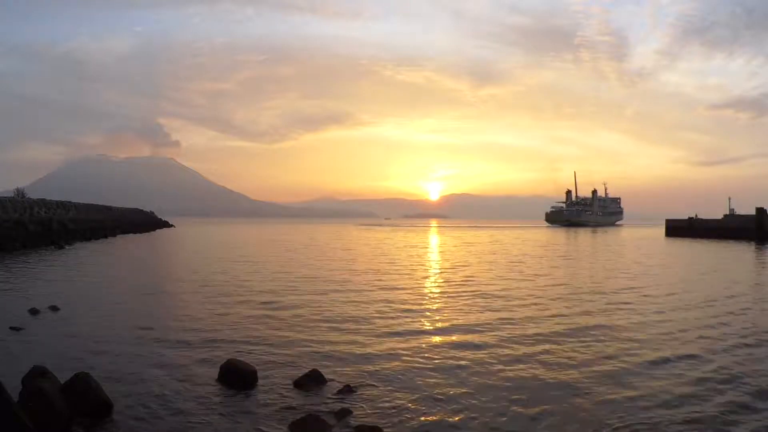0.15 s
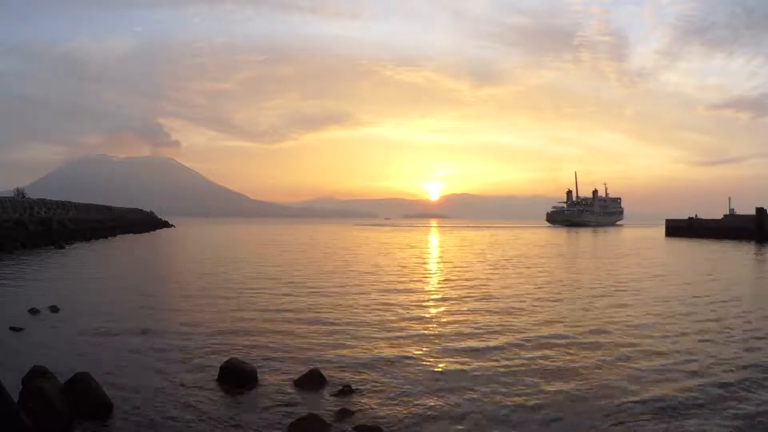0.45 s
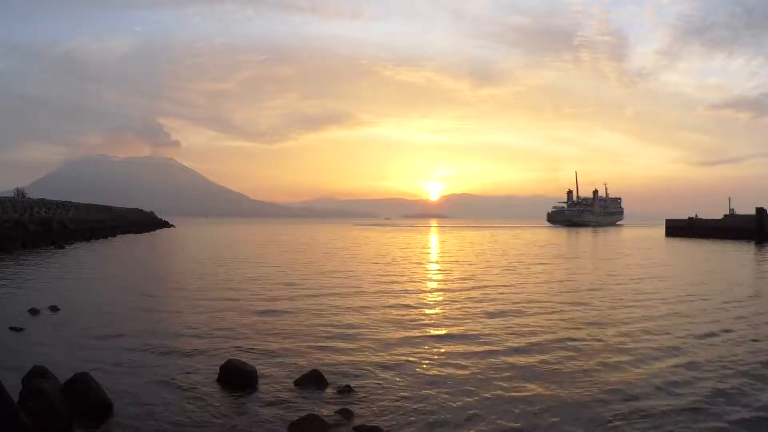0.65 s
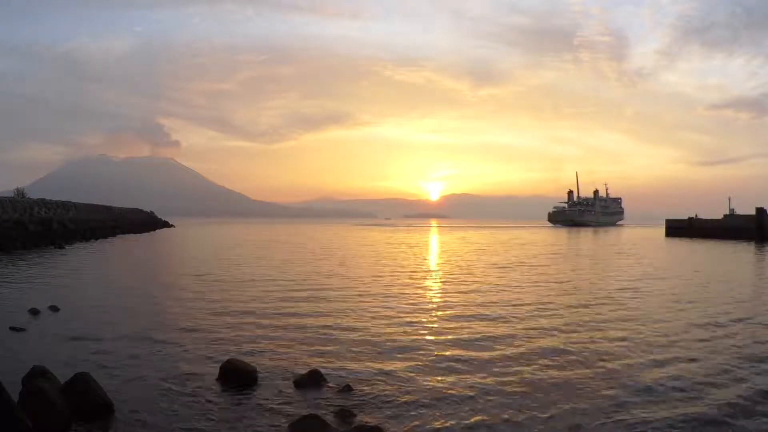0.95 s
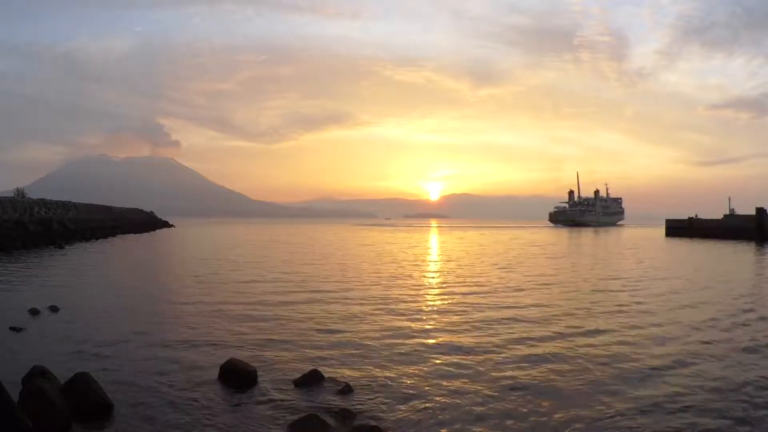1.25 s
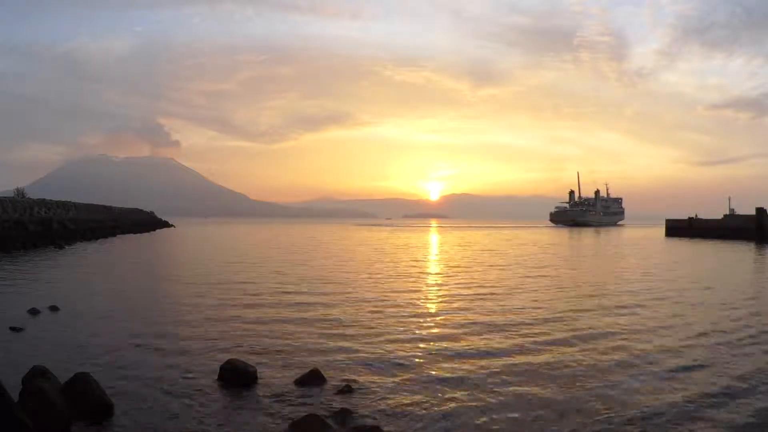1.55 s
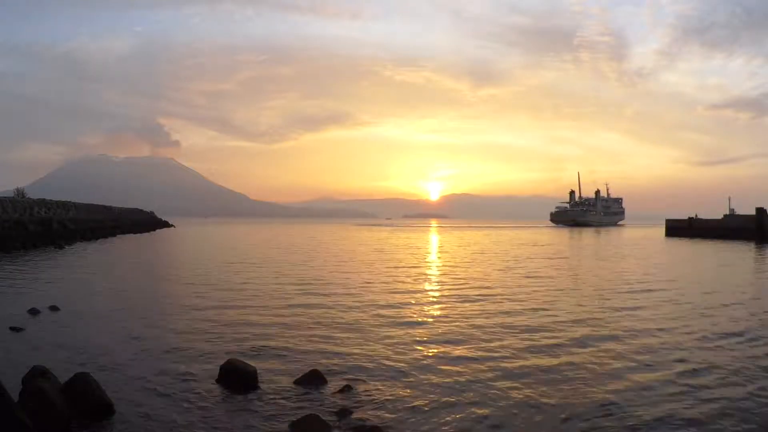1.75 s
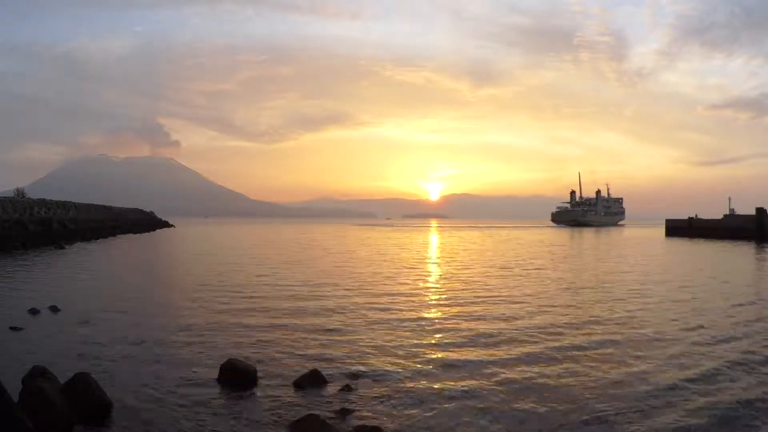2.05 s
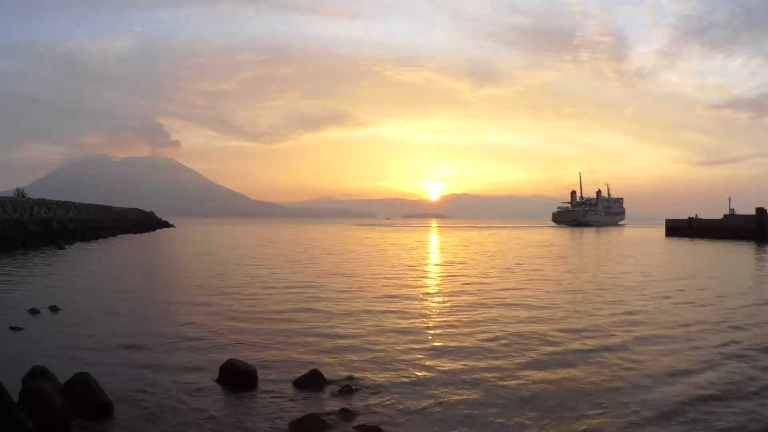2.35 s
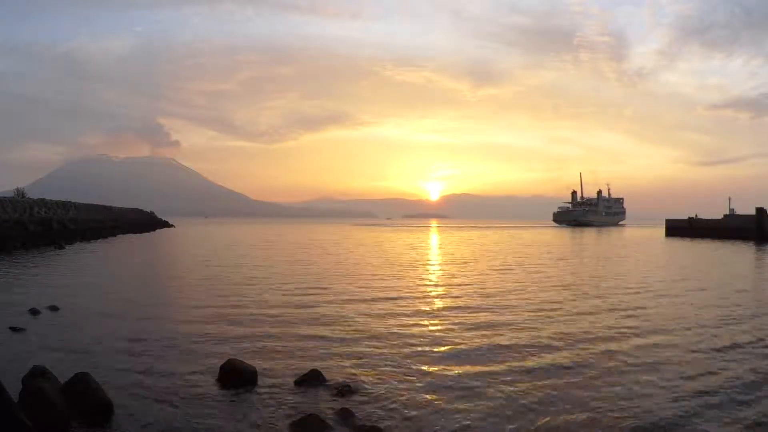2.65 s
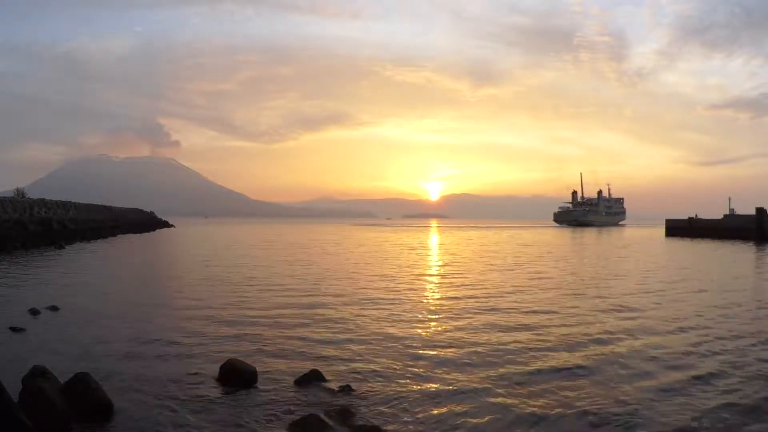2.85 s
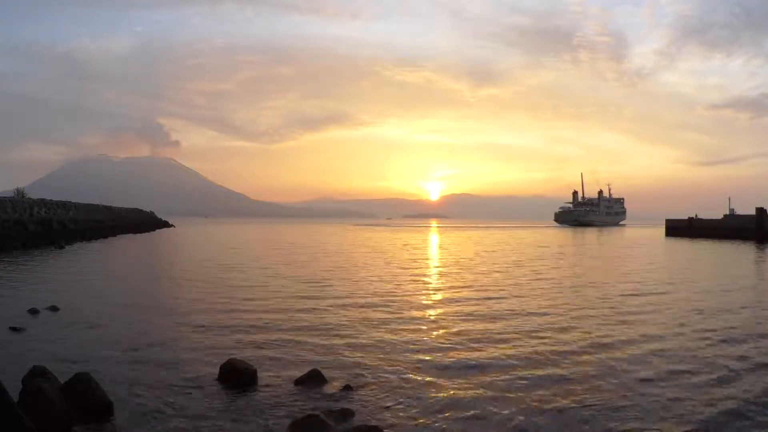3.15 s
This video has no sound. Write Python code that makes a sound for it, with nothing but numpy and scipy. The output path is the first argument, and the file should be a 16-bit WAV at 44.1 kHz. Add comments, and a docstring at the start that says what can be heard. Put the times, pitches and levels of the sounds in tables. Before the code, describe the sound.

A distant ferry's diesel engines drone steadily over softly washing, lapping harbour water.

```python
"""Distant ferry on calm harbour water

The diesels drone in unsteady shaft orders over a rumble, two close notes beating; the wash hisses.
Ripples lap at near rocks with soft splashes, plips, ticks and a gurgle dulled by the microphone's
closed housing. The electronics add a thin hiss and a faint high buzz.
A very faint patchy low rumble and high hiss are opposite in the two channels."""
import sys
import numpy as np
from scipy import signal
from scipy.fft import rfft, irfft, next_fast_len
from scipy.io import wavfile
from scipy.ndimage import uniform_filter1d, map_coordinates

SR = 44100
rng = np.random.default_rng(int(sys.argv[2]) if len(sys.argv) > 2 else 0)


def dump(signal):
    """Clip the signal to [-1, 1] and save it as 16-bit WAV at the path in sys.argv[1]."""
    limited = np.clip(np.atleast_2d(signal).T, -1, 1)
    pcm = np.round(limited * 32767).astype(np.int16)
    wavfile.write(sys.argv[1], SR, pcm)


N = 145530
TIME_S = np.arange(N) / SR
BUBBLE_RISE = 0.093  # relative pitch climb

# Low band of water noise: freq_hz, relative_db
ROAR_SPECTRUM = [(160, -33), (280, -4.5), (334, 2.5), (404, -2), (482, -2), (523, -4), (569, -2.5),
                 (650, -2), (692, -5), (737, -2), (831, -7), (895, -4), (1100, -15.5), (1430, -42.5),
                 (2420, -120)]
# Middle band of water noise: freq_hz, relative_db
SPRAY_SPECTRUM = [(620, -29.5), (1050, -1.5), (1390, -1.5), (1520, -4.5), (1760, -4.5), (2730, -14.5),
                  (3200, -21), (3680, -30.5), (4110, -43), (4500, -76.5), (5850, -100.5), (9900, -120)]


def amp(db):
    """dB to gain."""
    return 10 ** (np.asarray(db) / 20)


def unit(x):
    """Scale to rms 1."""
    return x / np.sqrt(np.mean(x ** 2) + 1e-20)


def curves(rows):
    """Per-sample curve of each column after time_s."""
    time_s, *columns = np.transpose(rows)
    return [np.interp(TIME_S, time_s, column) for column in columns]


def wobble(rate_hz):
    """Smooth random curve, rate_hz knots a second."""
    knots = rng.standard_normal(int(N * rate_hz / SR) + 4)
    return map_coordinates(knots, [np.arange(N) * rate_hz / SR])


def drifting_phase(hz, drift, rate_hz):
    """Phase in radians of a frequency that wanders by the fraction drift."""
    return 2 * np.pi * np.cumsum(hz * (1 + drift * wobble(rate_hz))) / SR


def filtered(x, response):
    """Apply the gain response(hz)."""
    size = next_fast_len(N + 8192)
    return irfft(rfft(x, size) * response(np.fft.rfftfreq(size, 1 / SR)), size)[..., :N]


def coloured(x, spectrum):
    """Shape x by (freq_hz, relative_db) points on a log axis; rms 1."""
    freq_hz, db = np.transpose(spectrum)
    log_freq = np.log(freq_hz + 1)
    return unit(filtered(x, lambda hz: amp(np.interp(np.log(hz + 1), log_freq, db, -120, -120))))


def rush(spectrum, patchy_db):
    """Coloured noise, gain uneven over time and frequency; rms 1."""
    bins = signal.stft(rng.standard_normal(N), nperseg=512)[2]
    patches = uniform_filter1d(rng.standard_normal(bins.shape), size=6, axis=0)
    patches = unit(uniform_filter1d(patches, size=10, axis=1))
    noise = signal.istft(bins * amp(patchy_db * patches), nperseg=512)[1][:N]
    return coloured(noise, spectrum)


def burst(t, fall_15db_s, attack_s):
    """Envelope: quick attack, Gaussian decay."""
    return amp(-15 * (t / fall_15db_s) ** 2) * (1 - np.exp(-t / attack_s))


def diesels():
    """Shaft orders fade in the air over a rumble; two engines' notes beat, exhaust swelling in step."""
    # Drone band levels: time_s, upper_db, low_db, middle_db
    band_levels = [(0, -38.5, -38.5, -44), (.2, -32.5, -44.5, -36.5), (.5, -36, -39.5, -39.5),
                   (.7, -36, -42, -37.5), (.95, -33.5, -44, -41.5), (1.3, -33.5, -42, -40),
                   (1.7, -34.5, -41.5, -42.5), (2, -36, -42, -38.5), (2.3, -36, -42.5, -46),
                   (2.6, -34, -43, -39.5), (2.85, -34, -39, -46.5), (3.0, -38.5, -40.5, -39.5),
                   (3.3, -33, -38.5, -42)]
    # Shaft orders: cycle_multiple, relative_db
    orders = [(6, -14), (8.36, -9.5), (9.5, -11), (11, -14.5), (12.3, -7.5), (13.5, -6), (14.3, -5),
              (21.6, -8.5), (22, -6.5), (24, -5), (25.9, -11.5), (29.5, -11), (32.2, -10), (43.2, -20),
              (60.85, -10.5), (62.6, -16.5), (73, -20.5), (84, -22), (93, -26), (114.6, -18.5)]
    # Engine rumble: freq_hz, relative_db
    rumble_spectrum = [(12, -49.5), (22, -25.5), (45, -8.5), (54, -15), (64, -1.5), (90, -4), (112, -9),
                       (124, -8), (140, -12), (160, -27)]
    # Exhaust noise: freq_hz, relative_db
    exhaust_spectrum = [(120, -31), (143, -12), (156, -2.5), (172, -5.5), (205, -5), (221, -12),
                        (232, -8.5), (255, -9.5), (276, -17), (300, -32.5), (380, -48.5)]
    tones_db, fade_db, quiver_rad = -37.8, 1.6, 0.35
    beat_hz, in_step_s = 8.1, 1.46
    low_top_hz, middle_top_hz = 92, 135
    upper_db, low_db, middle_db = curves(band_levels)

    cycle = drifting_phase(hz=7.86, drift=0.00302, rate_hz=2.503)
    tones = np.zeros(N)
    for order, db in orders:
        gain = amp(db + fade_db * wobble(4.44))
        tones += gain * np.sin(order * cycle + quiver_rad * wobble(4.28) + rng.uniform(0, 2 * np.pi))
    beat = 2 * np.pi * beat_hz * (TIME_S - in_step_s)
    note_phase = 20 * cycle + quiver_rad * wobble(4.96)
    first_engine = amp(2 + fade_db * wobble(3)) * np.sin(note_phase)
    second_engine = amp(-3.5) * np.sin(note_phase + beat)
    exhaust = amp(-4) * (1 + 0.12 * np.cos(beat)) * rush(exhaust_spectrum, patchy_db=1)
    upper_tones = first_engine + second_engine + filtered(tones, lambda hz: hz >= middle_top_hz)
    upper = amp(tones_db - upper_db.mean()) * upper_tones + exhaust

    bass_tones = filtered(tones, lambda hz: hz < middle_top_hz)
    bass = amp(tones_db - low_db.mean()) * bass_tones + rush(rumble_spectrum, patchy_db=2)
    low = filtered(bass, lambda hz: 1 / (1 + (hz / low_top_hz) ** 20))
    return amp(upper_db) * upper + amp(low_db) * low + amp(middle_db) * (bass - low)


def wash():
    """Far wake and fans: a roar under a softer hiss."""
    # Wash levels: time_s, roar_db, hiss_db
    levels = [(0, -38.5, -46.5), (.5, -38.5, -47.5), (1, -40, -46.5), (1.58, -39, -47), (1.67, -42, -46.5),
              (1.8, -39, -46), (2.2, -39, -47), (2.6, -39.5, -47), (3, -39.5, -45.5), (3.3, -39, -44.5)]
    roar_db, hiss_db = curves(levels)
    waver_db = 0.067 * wobble(22)
    roar = amp(roar_db + waver_db) * rush(ROAR_SPECTRUM, patchy_db=0.7)
    hiss = amp(hiss_db + waver_db + 0.14 * wobble(30)) * rush(SPRAY_SPECTRUM, patchy_db=1.2)
    return roar + hiss


def plips():
    """Single bubbles ring, climbing in pitch as they die."""
    # Bubbles: start_s, pitch_hz, level_db, fall_15db_s
    bubbles = [(.663, 1470, -41, 0.014), (.684, 1670, -46, 0.015), (.705, 1720, -44.5, 0.028),
               (.885, 2270, -45.5, 0.017), (1.626, 580, -35, 0.014), (1.628, 770, -37, 0.011),
               (1.649, 902, -31.5, 0.019), (1.662, 1750, -39.5, 0.013), (1.665, 2300, -35, 0.007),
               (3.12, 945, -31.5, 0.016)]
    out, t = np.zeros(N + SR), np.arange(SR // 8) / SR
    for start_s, pitch_hz, level_db, fall_s in bubbles:
        ring = np.sin(2 * np.pi * pitch_hz * (t + BUBBLE_RISE * t * t / fall_s / 2))
        out[round(start_s * SR):][:len(t)] += amp(level_db) * burst(t, fall_s, attack_s=0.0016) * ring
    return out[:N]


def ticks():
    """Ripples tick in short bursts of narrow-band noise."""
    # Ripple ticks: start_s, centre_hz, level_db, fall_15db_s
    events = [(.446, 7100, -76, 0.011), (1.662, 7200, -73, .015), (1.709, 6900, -68, .01),
              (1.728, 7050, -77, .008), (2.934, 5000, -84, .02), (2.977, 6440, -76, .007),
              (3.18, 6650, -68, .008), (3.18, 5050, -84, .007)]
    out, t = np.zeros(N + SR), np.arange(SR // 8) / SR
    for start_s, centre_hz, level_db, fall_s in events:
        band = signal.butter(2, [0.94 * centre_hz, 1.06 * centre_hz], "band", fs=SR, output="sos")
        noise = unit(signal.sosfilt(band, rng.standard_normal(len(t))))
        out[round(start_s * SR):][:len(t)] += amp(level_db) * burst(t, fall_s, attack_s=0.00096) * noise
    return out[:N]


def splashes():
    """Wavelets slap the rocks: soft noise bursts in three bands."""
    # Slaps: centre_s, half_width_s, roar_db, spray_db, mist_db
    slaps = [(0.07, 0.016, -54, -46, -85), (0.696, 0.012, -52, -55, -82), (0.896, 0.017, -57, -51, -80),
             (1.637, 0.034, -36, -63, -79), (1.676, 0.017, -46, -43, -71), (1.708, .012, -46, -45, -74),
             (1.894, 0.014, -54, -45, -78), (2.061, 0.016, -61, -44.5, -78), (2.137, 0.0049, -56, -41, -69),
             (2.984, 0.0053, -52, -55, -70), (3.175, 0.0032, -63, -44, -73)]
    # Splash treble: freq_hz, relative_db
    mist_spectrum = [(5900, -28.5), (6300, -2), (7200, -0.5), (8500, -4.5), (11000, -4), (14000, -5),
                     (15700, -6.5)]
    centre_s, half_width_s, *levels_db = np.transpose(slaps)
    envelopes = np.exp(-((TIME_S - centre_s[:, None]) / half_width_s[:, None]) ** 2)
    return sum(amp(db) @ envelopes * coloured(rng.standard_normal(N), spectrum)
               for db, spectrum in zip(levels_db, (ROAR_SPECTRUM, SPRAY_SPECTRUM, mist_spectrum)))


def gurgle():
    """Many faint bubbles, each climbing a little; high ones are weaker."""
    count, median_hz, life_cycles = 260, 1099.3, 13.3
    base_db, scatter_db, tilt_db_per_octave = -53, 1.2, -5.7
    start_draw, pitch_draw, level_draw = np.hsplit(rng.uniform(0.0011, 1, (count, 3)), 3)
    pitch_hz = np.clip(median_hz * (pitch_draw / (1.001 - pitch_draw)) ** (0.6 / 1.7), 300, 2500)
    octaves_above = np.maximum(np.log2(pitch_hz / median_hz), 0)
    level_db = base_db - scatter_db * np.log(level_draw) + tilt_db_per_octave * octaves_above
    samples = np.arange(SR // 16)
    cycles = pitch_hz * samples / SR
    age = cycles / life_cycles
    envelope = 2 * age * np.exp(1 - 2 * age)
    rings = amp(level_db) * envelope * np.sin(2 * np.pi * cycles * (1 + BUBBLE_RISE * age / 4))
    positions = (start_draw * N).astype(int) + samples
    return np.bincount(positions.ravel(), rings.ravel(), N + SR)[:N]


def housing(x, cutoff_hz=2610):
    """The closed microphone housing acts as a steep low-pass."""
    return filtered(x, lambda hz: 1 / (1 + (hz / cutoff_hz) ** 10))


def electronic_buzz():
    """High harmonics of a slightly unsteady buzz."""
    # Harmonic envelope: freq_hz, relative_db
    spectrum = [(8000, -21.5), (9000, -7), (10200, -9.5), (11000, -18), (12800, -17.5), (13700, -6.5),
                (14600, -1.5), (15150, 7), (15330, 2.5), (15750, 0.5)]
    # Pattern repeating every three harmonics: offset_db
    pattern_db = [-5, 1.5, -5]
    pitch_hz, base_db = 59.894, -87
    phase = drifting_phase(pitch_hz, drift=0.00025, rate_hz=5)
    freq_hz, relative_db = np.transpose(spectrum)
    out = np.zeros(N)
    for k in range(135, 263):
        level_db = base_db + pattern_db[k % 3] + np.interp(k * pitch_hz, freq_hz, relative_db)
        out += amp(level_db) * np.sin(k * phase + rng.uniform(0, 2 * np.pi))
    return out


def electronic_hiss():
    """Thin flickering hiss, alike in both channels."""
    # Hiss: freq_hz, relative_db
    spectrum = [(4450, -46), (4690, -33), (4820, -18.5), (5030, -22), (5400, -28.5), (5650, -55),
                (5800, -44), (5900, -26), (6140, -20.5), (6410, -13.5), (6790, -11.5), (7710, -16),
                (9580, -11), (10900, -15), (12700, -16), (13600, -11), (14500, -5), (14850, 1),
                (14970, 5.5), (15060, -4.5), (15130, -0.5), (15220, -4), (15800, -4.5)]
    flicker_hz, flicker_depth = 64.4, 0.16
    flicker = 1 + flicker_depth * np.sin(2 * np.pi * flicker_hz * TIME_S)
    return amp(-69 + 1.2 * wobble(130)) * flicker * rush(spectrum, patchy_db=1)


def faint_stereo_noise():
    """Very faint patchy low rumble and high hiss, opposite in the two channels."""
    # High hiss: freq_hz, relative_db
    hiss_spectrum = [(11500, -22), (13000, -6.5), (15000, 0), (15750, 6)]
    # Low rumble: freq_hz, relative_db
    rumble_spectrum = [(15, -29.5), (25, 1), (215, -3.5), (500, -34), (11000, -46), (14000, -79.5)]
    noise = amp(-83.5) * coloured(rng.standard_normal(N), hiss_spectrum)
    noise += amp(-74.5) * rush(rumble_spectrum, patchy_db=9.5)
    return np.array([noise, -noise])


def scene():
    """One capsule picks up ferry and water, so the channels are nearly alike."""
    dull_gurgle = housing(gurgle())
    ferry = diesels() + wash()
    ripples = plips() + ticks() + splashes() + dull_gurgle
    return ferry + ripples + electronic_buzz() + electronic_hiss() + faint_stereo_noise()


def record(dry):
    """Brick-wall band limit."""
    top_hz = 15750
    return filtered(dry, lambda hz: hz < top_hz)


dry = scene()
out = record(dry)
dump(out)
```